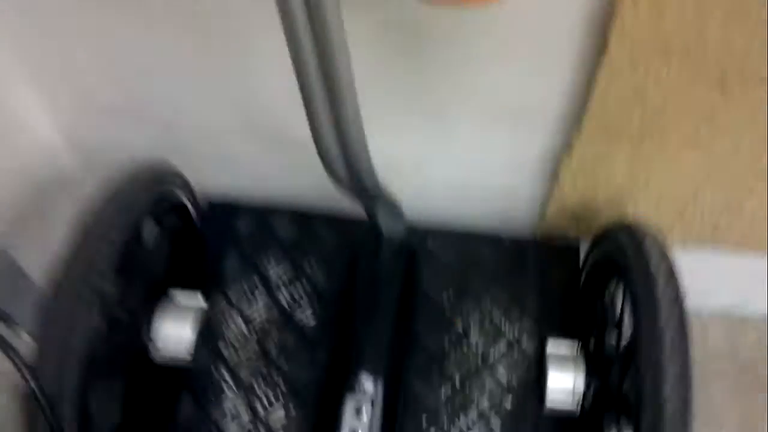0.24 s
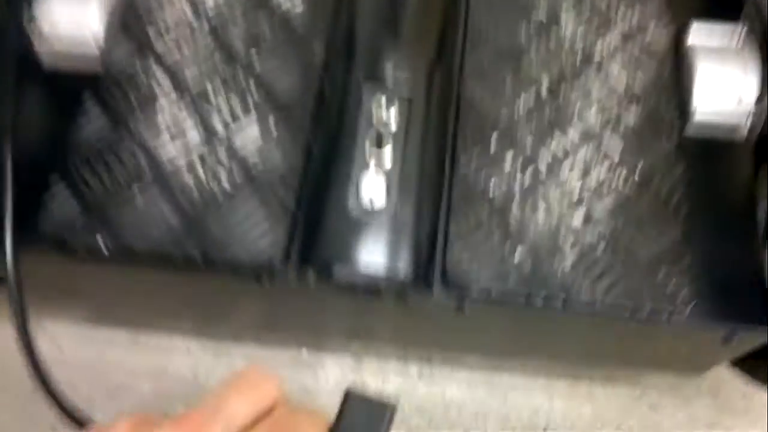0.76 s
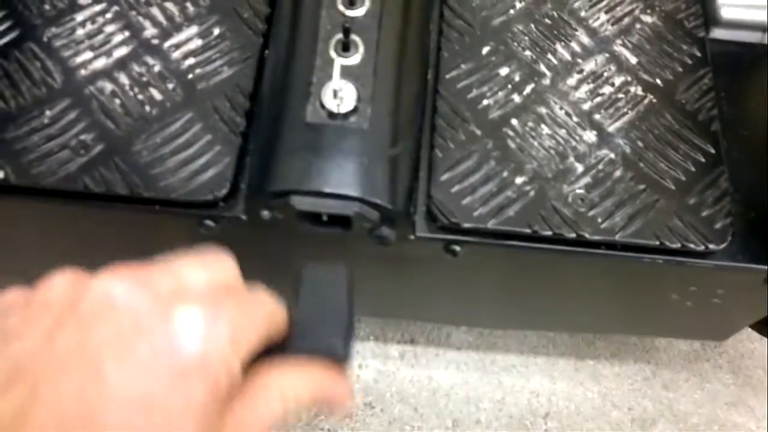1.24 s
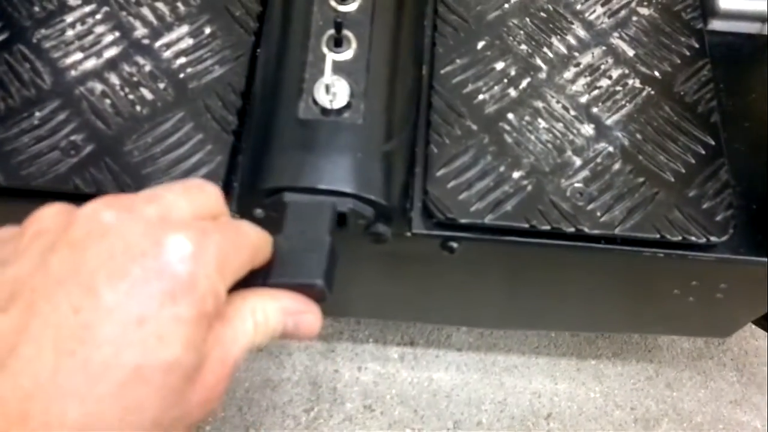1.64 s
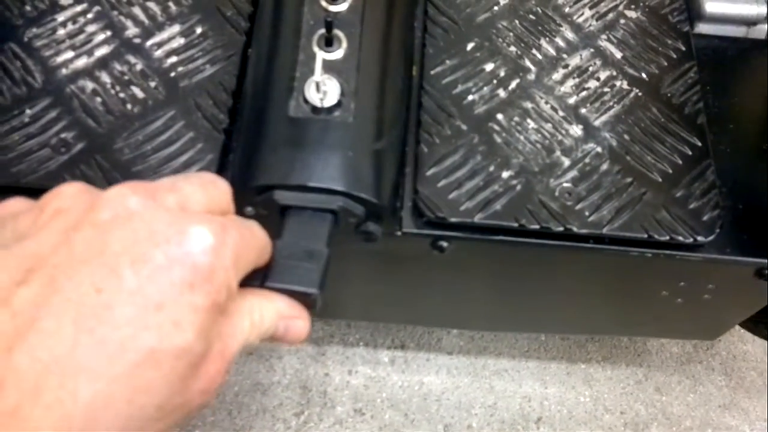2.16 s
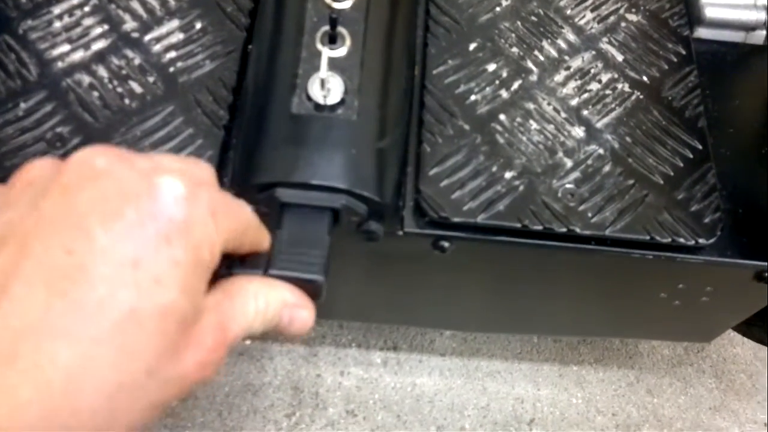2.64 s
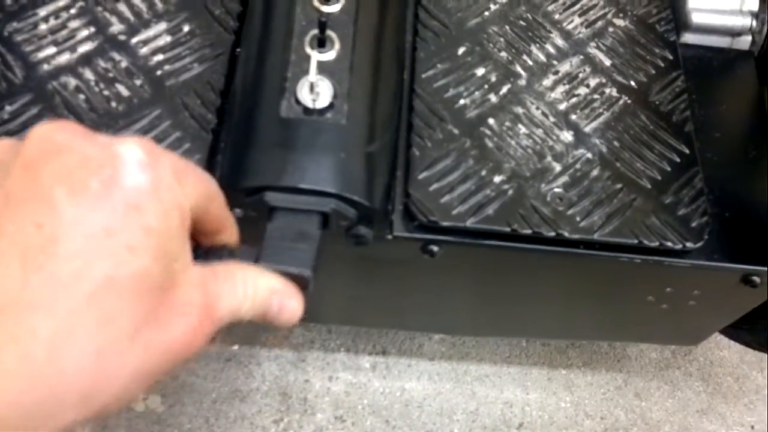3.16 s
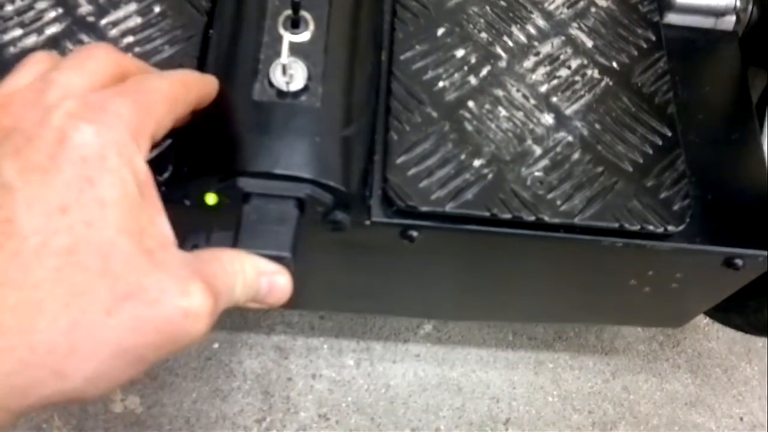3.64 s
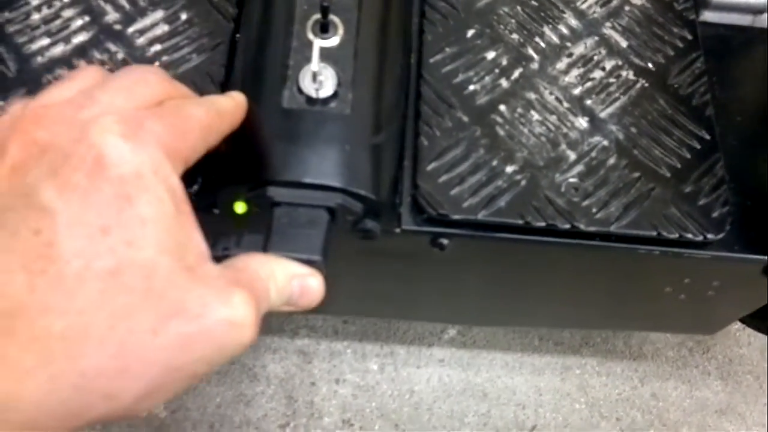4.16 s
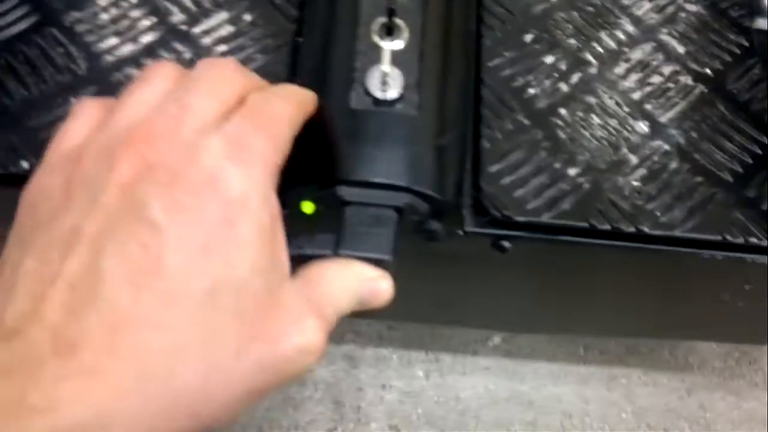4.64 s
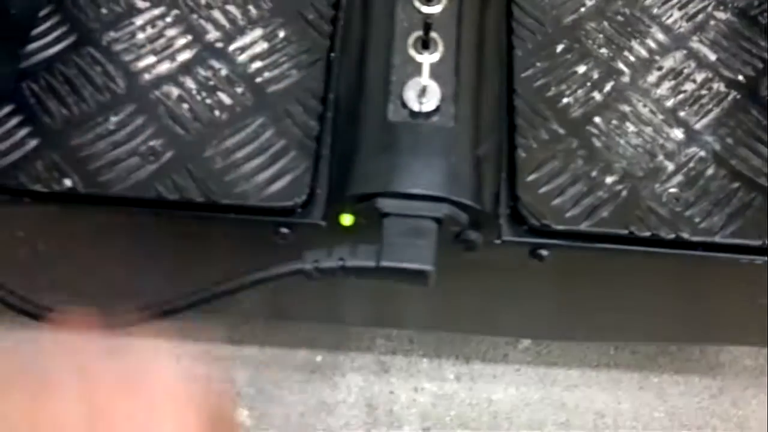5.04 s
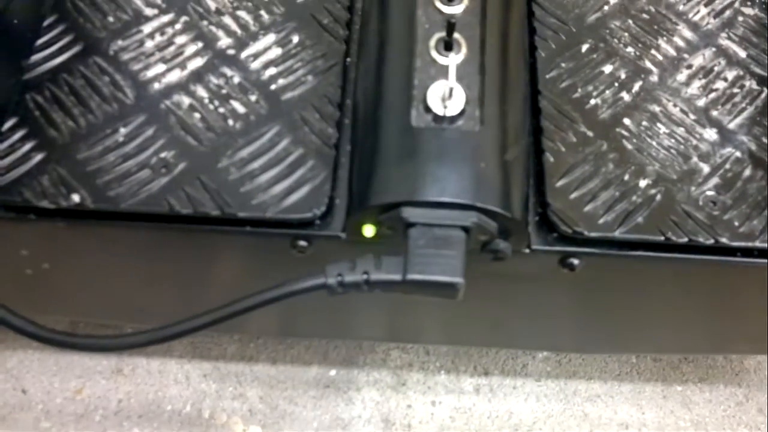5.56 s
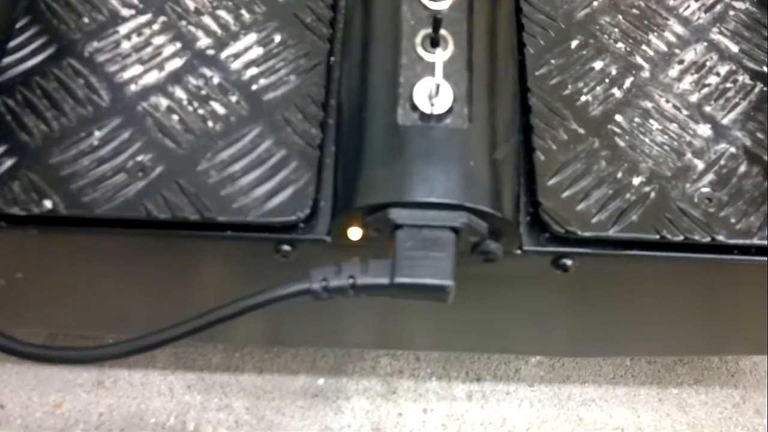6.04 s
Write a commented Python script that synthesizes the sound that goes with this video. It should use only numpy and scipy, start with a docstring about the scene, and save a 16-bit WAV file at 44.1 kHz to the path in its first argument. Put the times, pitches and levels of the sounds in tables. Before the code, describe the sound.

Close handheld microphone in a small, quiet, hard room. Low air buffets and sleeve rustle open, with hard plastic knocks and ticks of plug and cable against the scooter. Smaller taps follow, then near quiet with faint finger shifts. The plug is then driven into its socket in a dense run of metallic clunks and clicks. A faint scrape and two late clacks follow as the hand brushes away, leaving soft room hush.

```python
"""A mains plug scrapes and jolts into a scooter's charging socket: grainy forces ring chassis and bracket modes.
Plug and cable knock before that (noise bursts), a sleeve rustles (band noise, hiss); sharp ticks (short sines)
fall among knocks and jolts alike. Pins squeak, the hand brushes off, a fingertip and skin draw thin tones
(jittered sines). Low modes and rumble come through the floor, slow swings of air buffet the left port;
a small quiet room adds echoes (decaying noise tail) and a steady hush (shaped noise)."""
import sys
import numpy as np
from scipy import signal
from scipy.fft import rfft, irfft, next_fast_len
from scipy.io import wavfile
from scipy.ndimage import uniform_filter1d, map_coordinates

SR = 44100
rng = np.random.default_rng(int(sys.argv[2]) if len(sys.argv) > 2 else 0)


def master_out(mix):
    """Clip the mix to full scale and print it as 16-bit PCM to the path in sys.argv[1]."""
    frames = np.transpose(np.atleast_2d(mix))
    ceiling = np.clip(frames, -1, 1)
    pcm = np.round(ceiling * 32767).astype(np.int16)
    wavfile.write(sys.argv[1], SR, pcm)


N = 277785
TIME = np.arange(N) / SR

# Table levels are relative: layers add their own gains.
# spectrum of the room's hush: freq_hz, density_db
HUSH_SPECTRUM = [(8.8, -32.5), (15, -2), (59, -4), (108, -17.5), (125, -24), (188, -16), (308, -22.5),
                 (449, -19), (535, -29), (636, -19.5), (694, -26), (1240, -27), (1660, -29.5),
                 (3430, -32.5), (15600, -40.5)]
# left-right likeness of the hush: freq_hz, correlation
HUSH_LIKENESS = [(60, 0.11), (240, 0.22), (950, 0.27), (3770, -0.19), (15000, -0.19)]
# left-right likeness of near sounds: freq_hz, correlation
NEAR_LIKENESS = [(60, .93), (300, .98), (950, .96), (1500, .72), (4000, .55), (12000, .3)]
# left-right likeness of echoes: freq_hz, correlation
ECHO_LIKENESS = [(60, .9), (900, .9), (1500, .2), (4000, .02)]
# decay of the room: freq_hz, t60_s
ROOM_DECAY = [(200, .3), (2000, 0.24), (10000, 0.096)]
# sleeve sliding: time_s, level_db, hiss_db
RUSTLE = [(0, -71, -77), (.2, -62, -68), (.29, -61.5, -66), (.344, -53, -49), (.44, -46, -55),
          (.49, -58, -56.5), (.58, -54.5, -50.5), (.68, -56.5, -57), (.78, -59, -52.5), (.805, -62, -62),
          (.948, -71.5, -68.5), (1.25, -70.5, -73.5), (1.55, -80, -81.5)]
# fingers shifting on the plug: start_s, hold_s, level_db, hiss_db
SCUFFS = [(1.752, 0.031, -73.5, -68.5), (2.67, .03, -57, -83.5), (2.746, 0.078, -68.5, -75),
          (2.956, 0.023, -62.5, -75), (3.052, .008, -78.5, -83.5), (3.15, .03, -61.5, -85),
          (3.185, 0.046, -49.5, -63), (3.272, 0.02, -55.5, -85), (5.56, 0.032, -70.5, -70.5),
          (5.755, 0.021, -76, -70)]
SCUFF_RISE_DB_PER_S, SCUFF_FALL_DB_PER_S = 740, 1160
# spectrum of the sleeve: freq_hz, density_db
CLOTH_SPECTRUM = [(290, -37), (500, -6), (870, -8.5), (944, -9.5), (2110, 2.5), (2970, -13.5),
                  (3500, -23.5), (4550, -53.5), (7700, -120)]
# spectrum of fingers on the plug: freq_hz, density_db
GRIP_SPECTRUM = [(290, -43), (500, -14.5), (681, -10), (815, -26.5), (877, -20.5), (1580, -11), (1850, 4),
                 (2500, -5), (3500, -30), (4550, -60), (7700, -120)]
# spectrum of the fine hiss of rubbing: freq_hz, density_db
HISS_SPECTRUM = [(1290, -29.5), (2200, 0), (2830, -8), (3930, -2.5), (9260, -20), (11800, -25.5),
                 (13300, -26), (15500, -59)]
# weight shifting on the floor: time_s, level_db
RUMBLE = [(0, -67), (.35, -53.5), (.77, -69.5), (1.52, -79), (2.98, -75.5), (3.35, -66), (3.63, -69),
          (3.74, -60), (4.2, -67), (5.3, -62.5), (5.63, -76), (6.3, -82)]
# spectrum of the rumble: freq_hz, density_db
RUMBLE_SPECTRUM = [(40, -29), (80, -5.5), (125, -0.5), (180, -12), (300, -10.5), (450, -27.5), (700, -120)]
# single modes of floor, footplates, panels: start_s, level_db, pitch_hz, rise_constant_s, t60_s
THUMPS = [(0.287, -37, 160, 0.0042, 0.12), (0.338, -29.5, 211, 0.0026, 0.27),
          (.34, -28.5, 455, 0.0075, 0.27), (0.493, -16, 198, 0.0014, 0.1),
          (0.494, -23.5, 111.3, 0.0022, 0.15), (.497, -24.5, 766, 0.0028, .12),
          (3.455, -39.5, 957, 0.0042, 0.087), (3.755, -20, 717, 0.01, 0.2), (3.785, -28, 823, 0.0089, 0.17),
          (0.744, -42, 259, 0.0055, 0.11), (3.192, -40, 213, 0.01, 0.12), (3.268, -43.5, 147.3, 0.01, 0.17),
          (3.83, -18.5, 125.5, 0.0096, 0.12), (4.114, -31.5, 201, 0.012, 0.17),
          (4.399, -53.5, 240.5, .015, 0.23), (5.231, -49, 283, 0.012, 0.19)]
# air on the left port: middle_s, level_db, swing_hz, half_width_s
PUFFS = [(.005, -47, 40, 0.031), (0.135, -33.5, 40, 0.037), (0.175, -20.5, 32.5, 0.026),
         (0.368, -18, 31, 0.025), (0.429, -30.5, 29.86, 0.037)]
# sharp cracks, tiny ticks: start_s, level_db, pitch_hz, speck_db (re level)
TICKS = [(.2563, -37, 2010, -27), (0.2862, -32, 2250, -8), (.301, -31, 2170, -15.5),
         (.3247, -16.5, 2070, -31.5), (0.3361, -14, 2685, -28.5), (.4944, -22.5, 2540, -26),
         (.7412, -38, 2010, -28), (.782, -49, 2580, -11), (.8785, -45.5, 2150, -9),
         (0.9737, -43, 2140, -5.5), (1.0018, -22, 2410, -34), (1.112, -42.5, 2020, -9.5),
         (1.256, -53, 3400, -9), (1.3007, -41, 2170, -11), (1.316, -52, 3530, -10), (2.616, -31, 1754, -11),
         (2.9569, -53.5, 1806, -19.5), (3.749, -16, 3250, -31), (3.846, -25, 3600, -28.5),
         (3.9566, -20, 2250, -26), (3.982, -23, 1805, -34.5), (4.1137, -33.5, 1750, -25),
         (4.3842, -36.5, 1950, -34), (4.798, -34.5, 1900, -34), (4.9997, -43.5, 2530, -4.5),
         (5.226, -22, 2050, -35)]
TICK_T60_S = .019
# dull knocks of plug and cable: start_s, level_db, thud_db and bright_db (re level), base_t60_s
KNOCKS = [(.324, -11.5, -26.5, -17, .11), (.338, -13, -12, -3, 0.07), (.486, -30, 1, -23, 0.087),
          (.492, -15.5, -13.5, -13.5, 0.047), (.739, -32.5, -19, -9, .1), (1, -31, -43, -2, 0.097),
          (1.017, -31, -20.5, -5, .13), (1.091, -42.5, -35, -14, .099), (1.196, -47.5, -16.5, -20, .15),
          (1.448, -58, -18, -9, 0.21), (1.615, -44.5, -11, -26, 0.096), (2.022, -46, -7.5, -26, .12),
          (2.039, -44.5, -12, -25.5, 0.06), (2.617, -29, -22.5, -15.5, 0.11),
          (2.631, -29.5, -23.5, -15, 0.1)]
KNOCK_BASE_RISE_S = .0022
# jolts of plug in socket: start_s, level_db, thud_db and bright_db (re level), base_t60_s, base_rise_s
JOLTS = [(3.439, -40.5, -25, -3, .16, .0056), (3.455, -41, -34, -5.5, .087, .0026),
         (3.519, -35, -44, -10.5, .05, .0013), (3.531, -26, -27.5, -36, .14, .0086),
         (3.734, -21, -25, 1, 0.51, 0.0019), (3.748, -11.5, -30.5, -1, 0.29, .011),
         (3.781, -20.5, -20.5, -4, .061, .0013), (3.844, -20.5, -22, 4, .2, .0044),
         (3.861, -16, -27, -8, 0.085, .0031), (3.917, -26.5, -19.5, -0.5, .14, .0024),
         (3.956, -23.5, -24, 4.5, 0.094, .0013), (3.983, -23.5, -19.5, -29, 0.155, .0031),
         (4.059, -34.5, -41, -33, .34, 0.0061), (4.109, -29.5, -10.5, -10.5, .127, .0013),
         (4.128, -33.5, -14, -42, .075, .0016), (4.178, -21, -46, -12.5, .11, .0048),
         (4.195, -24, -35, -4.5, 0.124, 0.00088), (4.227, -36, -24, -26, 0.36, 0.0031),
         (4.715, -37.5, -20, -24, 0.11, .0032), (4.797, -34, -29, -19, .13, 0.0032),
         (5.224, -23, -34, 0, 0.15, 0.0018), (5.254, -17.5, -22, -5, 0.093, 0.015)]
# spectrum of plug and cable: freq_hz, density_db
PLASTIC_SPECTRUM = [(180, -33), (300, -6), (999, -4), (1240, -3), (1570, -3.5), (1700, 0.5), (2620, -6.5),
                    (4000, -37), (5200, -37), (8800, -120)]
# spectrum of the bright edge of contacts: freq_hz, density_db
BRIGHT_SPECTRUM = [(1470, -26), (2500, 0.5), (2850, -5.5), (3190, -4), (3980, -2.5), (4330, -7),
                   (7110, -19), (9800, -46.5), (15500, -76)]
# floor and footplate modes: freq_hz, width_hz, gain_db
THUD_MODES = [(122, 24, -3.5), (219, 19, -1.5), (292, 66, -5), (482, 130, -6.5)]
# metal panel modes: freq_hz, width_hz, gain_db
CHASSIS_MODES = [(730.6, 64, -0.5), (824, 20, 1.5), (886, 23, -4.5), (1032, 52, -4.5), (1109, 25, -5),
                 (1292, 37, 1), (1437, 20, -4), (1594, 73, 2.5), (1830, 71, -5.5), (1970, 80, 1),
                 (2106, 60, -10.5), (2370, 76, -13)]
# spectrum of many weaker panel modes: freq_hz, density_db
METAL_SPECTRUM = [(290, -56), (500, -16), (802, -16), (1200, -7), (1610, -5), (2430, -4.5), (3500, -33),
                  (4550, -79), (7700, -120)]
# stiff socket frame modes, hard contacts only: freq_hz, width_hz, gain_db
BRACKET_MODES = [(2850, 78, 5), (3163, 55, 7.5), (3254, 47, 6), (3790, 52, 7), (3960, 34, -8.5)]
# pins finding their slots: start_s, hold_s, level_db
SQUEAKS = [(3.452, .012, -54.5), (3.49, 0.041, -55)]
SQUEAK_RISE_DB_PER_S, SQUEAK_FALL_DB_PER_S = 710, 520
# plug pin modes: freq_hz, width_hz, gain_db
PIN_MODES = [(3600, 150, -11), (4700, 270, -3), (5350, 190, -3.5), (6870, 250, -6.5)]
# steady grinding pressure, one row: start_s, hold_s, upper_modes_db, lower_modes_db
PRESSURE = (4.5, 1.7, -58, -58.5)
# slips of the grinding plug: start_s, hold_s, upper_modes_db, lower_modes_db
SLIPS = [(4.392, 0.036, -44, -47), (4.47, 0.052, -46, -49), (4.718, .035, -52.5, -53.5),
         (4.8, 0.058, -46.5, -53), (4.96, 0.014, -51.5, -54.5), (5.06, 0.17, -49, -55.5),
         (5.24, 0.055, -44.5, -44.5)]
SLIP_RISE_DB_PER_S, SLIP_FALL_DB_PER_S = 1000, 210
# hand lets go: extra fade of the grinding
LET_GO_S, LET_GO_FALL_DB_PER_S = 5.385, 210
# hand sliding on the plug and off it: time_s, rasp_db, hiss_db
BRUSH = [(4.3, -82.5, -92), (4.382, -68, -73), (4.418, -49, -63.5), (4.455, -82, -77), (4.75, -73, -75),
         (4.874, -78, -72), (4.97, -63, -61), (5.02, -67, -56), (5.076, -44.5, -50), (5.21, -44, -51.5),
         (5.244, -40, -46.5), (5.37, -43, -54), (5.41, -55, -55.5), (5.46, -91, -81)]
# spectrum of sliding skin: freq_hz, density_db
SKIN_SPECTRUM = [(1470, -38.5), (2500, -9), (2760, -5), (3070, -5), (3720, -4.5), (4640, -4.5), (5080, -11),
                 (6300, -11.5), (9220, -33), (10900, -34.5), (12200, -35), (15500, -71)]
# hollow plug shell mode: freq_hz, width_hz, gain_db
SHELL_MODES = [(3670, 260, -4)]
# fingertip dragging on the panel: time_s, level_db, pitch_hz
DRAG = [(5.04, -67, 878), (5.08, -52.5, 933), (5.15, -49, 1090), (5.18, -61.5, 1180), (5.2, -76.5, 1200)]
# skin leaving the plug shell: time_s, level_db, pitch_hz
PEEL = [(5.28, -64, 3620), (5.33, -48, 3690), (5.37, -53, 3720), (5.39, -70, 3700)]
# shifting left-right place of near sounds: time_s, left_over_right_db
PLACE = [(0, -4), (.5, -7), (1.2, -6), (1.6, -1), (2.6, -4), (3.7, -4.5), (5.3, -5.5), (6.3, -3)]
# phase lead of the left port: freq_hz, lead_rad
PORT_LEAD = [(60, 0), (1050, .2), (1500, 1.5), (2000, 2.8), (3200, 4.5), (6000, 8), (15000, 18)]
# shading between the ports: freq_hz, left_over_right_db
PORT_SHADE = [(300, 2), (1500, -2), (5000, 1), (9000, 3), (13000, -1)]
# microphone response: freq_hz, gain_db
MICROPHONE = [(10000, 0.5), (13000, -5), (15700, -8)]
TOP_HZ = 15710


def amp(db):
    """Decibels to amplitude gain."""
    return 10 ** (np.asarray(db) / 20)


def unit(x):
    """Scale to rms 1."""
    return x / np.sqrt(np.mean(x ** 2) + 1e-20)


def along(points, hz):
    """Interpolate (freq_hz, value) points on a log axis."""
    freq_hz, value = np.transpose(points)
    return np.interp(np.log(hz + 1), np.log(freq_hz + 1), value)


def curves(rows):
    """One value per sample for each column after time; the first is -120 outside the table."""
    time_s, level_db, *others = np.transpose(rows)
    level = np.interp(TIME, time_s, level_db, -120, -120)
    return [level] + [np.interp(TIME, time_s, column) for column in others]


def traced(rows):
    """One gain per level column of a curve, silent outside it."""
    levels_db = np.array(curves(rows))
    return amp(levels_db) * (levels_db[0] > -119)


def gestures(rows, rise_db_per_s, fall_db_per_s):
    """One gain per level column: each gesture swells, holds and fades at fixed rates."""
    power = 0
    for start_s, hold_s, *levels_db in rows:
        before_s = np.maximum(start_s - TIME, 0)
        after_s = np.maximum(TIME - start_s - hold_s, 0)
        away_db = rise_db_per_s * before_s + fall_db_per_s * after_s
        power = power + amp(np.array(levels_db)[:, None] - away_db) ** 2
    return np.sqrt(power)


def wobble(knots_per_s):
    """Smooth random curve through normal random knots."""
    knots = rng.standard_normal(int(N * knots_per_s / SR) + 4)
    return map_coordinates(knots, [TIME * knots_per_s])


def filtered(x, response):
    """Apply a complex frequency response by zero-padded FFT."""
    length = x.shape[-1]
    size = next_fast_len(length + SR // 2)
    spectrum = rfft(x, size) * response(np.fft.rfftfreq(size, 1 / SR))
    return irfft(spectrum, size)[..., :length]


def modes(table):
    """Causal response of parallel resonances with alternating signs."""
    def response(hz):
        total = 0
        for k, (freq_hz, width_hz, gain_db) in enumerate(table):
            damping = 1j * hz * width_hz
            total = total + (-1) ** k * amp(gain_db) * damping / (freq_hz ** 2 - hz ** 2 + damping)
        return total
    return response


def shape(spectrum):
    """Response that gives white noise this spectrum."""
    return lambda hz: amp(along(spectrum, hz))


def part(response, split_hz, upper):
    """Share of a response above or below a soft split."""
    above = lambda hz: hz ** 6 / (hz ** 6 + split_hz ** 6)
    return lambda hz: response(hz) * (above(hz) if upper else 1 - above(hz))


def sounded(force, response):
    """Force through a response scaled to keep white-noise power."""
    grid_hz = np.linspace(1, SR / 2, 4096)
    scale = np.sqrt(np.mean(np.abs(response(grid_hz)) ** 2))
    return filtered(force, response) / scale


def grit(grain_db, knots_per_s, patchy_db=3.0):
    """Noise pair, rms 1, sharing grainy loudness and shifting patches of colour."""
    cells = signal.stft(rng.standard_normal((2, N)), nperseg=256)[2]
    field = uniform_filter1d(rng.standard_normal(cells.shape[1:]), size=3, axis=0)
    field = uniform_filter1d(field, size=8, axis=1)
    pair = signal.istft(cells * amp(patchy_db * unit(field)), nperseg=256)[1][:, :N]
    return unit(amp(grain_db * wobble(knots_per_s)) * pair)


def ports(pair, likeness):
    """Blend two unrelated noises to the left-right correlation of the ports."""
    def blend(hz):
        angle = np.arccos(np.clip(along(likeness, hz), -1, 1)) / 2
        return np.array([np.cos(angle), np.sin(angle)])
    mid, side = filtered(pair, blend)
    return np.array([mid + side, mid - side])


def pan(db):
    """Left and right gains for a level difference."""
    return amp(np.array([db / 2, -db / 2]))


def room_tone():
    """Steady hush of building and microphone: shaped, weakly correlated noise."""
    pair = ports(grit(0.3, 9.3, patchy_db=1.2), HUSH_LIKENESS)
    return amp(-64) * unit(filtered(pair, shape(HUSH_SPECTRUM)))


def rubbing(levels, band, band_db, hiss_db, grain_db):
    """Soft band of rubbing noise and a finer hiss above it."""
    soft = sounded(ports(grit(grain_db, 60), NEAR_LIKENESS), shape(band))
    fine = sounded(ports(grit(1.0, 130, patchy_db=2.5), NEAR_LIKENESS), shape(HISS_SPECTRUM))
    return levels[0] * amp(band_db) * soft + levels[1] * amp(hiss_db) * fine


def rustle():
    """Sleeve as the arm reaches down, then fingers on the plug: rubbing noise."""
    scuffs = gestures(SCUFFS, SCUFF_RISE_DB_PER_S, SCUFF_FALL_DB_PER_S)
    return (rubbing(traced(RUSTLE), CLOTH_SPECTRUM, band_db=5, hiss_db=3.0, grain_db=2.0)
            + rubbing(scuffs, GRIP_SPECTRUM, band_db=3.5, hiss_db=-1.3, grain_db=2.5))


def thumps():
    """One decaying sine per mode over a soft noise rumble, same at both ports but for level."""
    out, t = np.zeros(N + SR), np.arange(SR // 2) / SR
    for start_s, level_db, pitch_hz, rise_s, t60_s in THUMPS:
        envelope = amp(level_db - 60 * t / t60_s) * (1 - np.exp(-t / rise_s)) ** 2
        out[round(start_s * SR):][:len(t)] += envelope * np.sin(2 * np.pi * pitch_hz * t)
    level_db, = curves(RUMBLE)
    noise = unit(filtered(rng.standard_normal(N), shape(RUMBLE_SPECTRUM)))
    rumble = amp(level_db + 3.1 * wobble(4.7)) * noise
    return pan(-3.5)[:, None] * (out[:N] + rumble)


def puffs():
    """Swing or two of slow pressure each, 19 dB weaker at the right port."""
    air = 0
    for middle_s, level_db, swing_hz, half_width_s in PUFFS:
        envelope = amp(level_db) * np.exp(-2 * ((TIME - middle_s) / half_width_s) ** 2)
        air = air + envelope * np.sin(2 * np.pi * swing_hz * (middle_s - TIME))
    flutter = 1 + 0.13 * wobble(250)
    return air * flutter * amp([[0], [-19]])


def ticks():
    """A few quickly swelling sine cycles each, with a speck of noise."""
    out, t = np.zeros((2, N + SR)), np.arange(SR // 20) / SR
    for start_s, level_db, pitch_hz, speck_db in TICKS:
        swell = (1 - np.exp(-t / 0.00056)) * amp(2.5 - 60 * t / TICK_T60_S)
        ring = np.sin(2 * np.pi * pitch_hz * t) * swell
        speck = ports(rng.standard_normal((2, len(t))), NEAR_LIKENESS)
        speck = speck * amp(speck_db + 1.5 - 60 * t / 0.032)
        out[:, round(start_s * SR):][:, :len(t)] += amp(level_db) * (ring + speck)
    return pan(-4)[:, None] * filtered(out[:, :N], lambda hz: 1 / (1 + (hz / 11000) ** 4))


def strokes(events, layer, late, slow, crack):
    """Contact envelope: short crack, then a swell; late and slow stretch its rise and decay."""
    power = np.zeros(N + SR)
    t = np.arange(SR // 2) / SR
    snap = crack * (t / 0.0018) * np.exp(1 - t / 0.001)
    for start_s, level_db, thud_db, bright_db, t60_s, rise_s in events:
        layer_db = level_db + {"body": 0, "thud": thud_db, "edge": bright_db}[layer]
        swell = (1 - np.exp(-t / max(late * rise_s, 1e-4))) * amp(-60 * t / (slow * t60_s))
        power[round(start_s * SR):][:len(t)] += amp(layer_db) ** 2 * (swell ** 2 + snap ** 2)
    return np.sqrt(power[:N])


def contacts(events, body, edge, thud_db, bright_db, bright_slow, crack):
    """Grainy bursts of force: body answers, thud follows below, bright edge above."""
    def layer(name, late, slow, crack, grain_db, response):
        envelope = strokes(events, name, late, slow, crack)
        return sounded(ports(grit(grain_db, 300), NEAR_LIKENESS) * envelope, response)
    main = layer("body", late=1.5, slow=0.97, crack=crack, grain_db=3.0, response=body)
    thud = layer("thud", late=4.7, slow=1.3, crack=.05, grain_db=-2.0, response=modes(THUD_MODES))
    bright = layer("edge", late=0.99, slow=bright_slow, crack=crack, grain_db=1.0, response=edge)
    return amp(-4.5) * main + amp(thud_db) * thud + amp(bright_db) * bright


def knocks():
    """Plug and cable: noise bursts through the plastic spectrum."""
    events = [row + (KNOCK_BASE_RISE_S,) for row in KNOCKS]
    return contacts(events, shape(PLASTIC_SPECTRUM), shape(BRIGHT_SPECTRUM),
                    thud_db=1.5, bright_db=2, bright_slow=0.36, crack=1.0)


def chassis(hz):
    """Panel modes, steeply bounded below and above, over the broad answer of weaker ones."""
    bounds = 1 / (1 + (hz / 2700) ** 8) / (1 + (620 / (hz + 1)) ** 8)
    return bounds * modes(CHASSIS_MODES)(hz) + amp(-3) * shape(METAL_SPECTRUM)(hz)


def bracket(hz):
    """Stiff socket frame modes above a broad treble."""
    bounds = 1 / (1 + (hz / 4500) ** 4) / (1 + (2500 / (hz + 1)) ** 4)
    return bounds * modes(BRACKET_MODES)(hz) + amp(-6.5) * shape(BRIGHT_SPECTRUM)(hz)


def jolts():
    """Plug driven home: bursts of force ring chassis and bracket."""
    return contacts(JOLTS, chassis, bracket, thud_db=5.0, bright_db=-5, bright_slow=0.82, crack=0.83)


def sliding(levels, responses, grain_db, knots_per_s, side_db, uneven_db):
    """Stick and slip as grainy, uneven forces through the things they shake."""
    total = 0
    for level, response in zip(levels, responses):
        force = ports(grit(grain_db, knots_per_s, 2 * uneven_db), NEAR_LIKENESS)
        total = total + sounded(level * amp(uneven_db * wobble(30)) * force, response)
    return pan(side_db)[:, None] * total


def squeak():
    """Sliding force rings the plug pins."""
    levels = gestures(SQUEAKS, SQUEAK_RISE_DB_PER_S, SQUEAK_FALL_DB_PER_S)
    return sliding(levels, [modes(PIN_MODES)], grain_db=4.0, knots_per_s=250, side_db=5.0, uneven_db=1.64)


def scrape():
    """Steady pressure and slips grind upper and lower chassis modes until the hand lets go."""
    push = gestures([PRESSURE] + SLIPS, SLIP_RISE_DB_PER_S, SLIP_FALL_DB_PER_S)
    push = push * amp(-LET_GO_FALL_DB_PER_S * np.maximum(TIME - LET_GO_S, 0))
    responses = [part(chassis, 1200, upper=True), part(chassis, 1400, upper=False)]
    return sliding(push, responses, grain_db=2.5, knots_per_s=150, side_db=-1.5, uneven_db=1.64)


def brush():
    """Skin rasp and hiss, reinforced by the hollow plug shell."""
    skin = lambda hz: shape(SKIN_SPECTRUM)(hz) * (1 + np.abs(modes(SHELL_MODES)(hz)))
    responses = [part(skin, 6100, upper=False), part(skin, 5460, upper=True)]
    return sliding(traced(BRUSH), responses, grain_db=1.5, knots_per_s=330, side_db=1.5, uneven_db=0.6)


def drag(rows, waver):
    """Fuzzy friction tone: sine with jittered pitch (waver: relative) and level."""
    level_db, pitch_hz = curves(rows)
    phase = 2 * np.pi * np.cumsum(pitch_hz * (1 + waver * wobble(150))) / SR
    return amp(level_db + 3 + 2.5 * wobble(99)) * np.sin(phase)


def leading(pair):
    """Phase lead and shading between the ports, half on each side."""
    def response(hz):
        turn = np.exp(.5j * along(PORT_LEAD, hz) * np.array([[1], [-1]]))
        return pan(along(PORT_SHADE, hz)) * turn
    return filtered(pair, response)


def room(x):
    """Wall echoes: delayed noise tail, each frequency dying at its own speed."""
    hz, t, cells = signal.stft(rng.standard_normal((2, SR // 2)), SR, nperseg=256)
    decay = amp(-60 * t / along(ROOM_DECAY, hz)[:, None])
    tail = signal.istft(cells * decay, SR, nperseg=256)[1]
    delayed = np.pad(x, (300, 0))[None]  # 300 samples
    return signal.fftconvolve(delayed, tail / np.linalg.norm(tail[0]), axes=1)[:, :N]


def scene():
    """Near sounds with echoes, plus what comes through floor and air."""
    near = rustle() + ticks() + knocks() + jolts() + squeak() + scrape() + brush()
    near = near + drag(DRAG, waver=.07) + drag(PEEL, waver=0.017)
    near = near * pan(np.interp(TIME, *np.transpose(PLACE)))
    echoes = amp(-9.5) * ports(room(near.mean(axis=0)), ECHO_LIKENESS)
    return room_tone() + thumps() + puffs() + leading(near) + echoes


def record(dry):
    """Microphone response, with a sharp cut at TOP_HZ."""
    return filtered(dry, lambda hz: shape(MICROPHONE)(hz) * (hz < TOP_HZ))


dry = scene()
out = record(dry)
master_out(out)
```